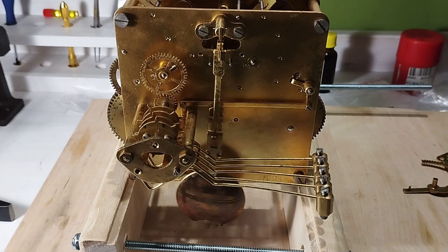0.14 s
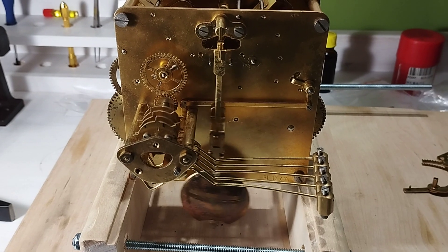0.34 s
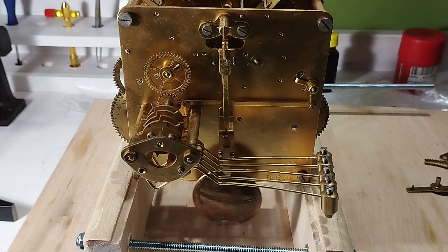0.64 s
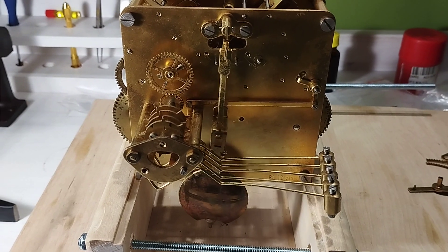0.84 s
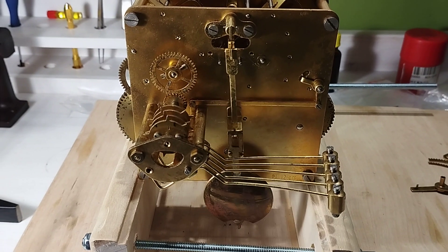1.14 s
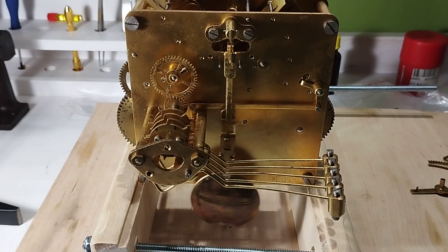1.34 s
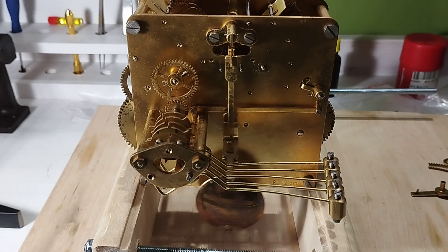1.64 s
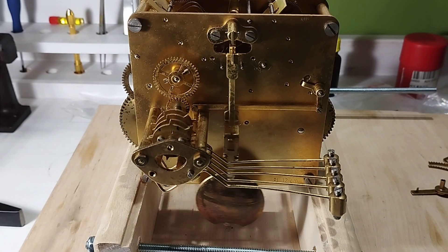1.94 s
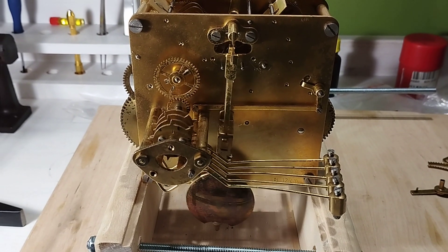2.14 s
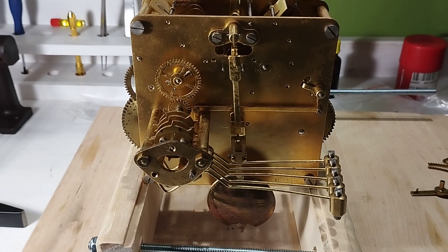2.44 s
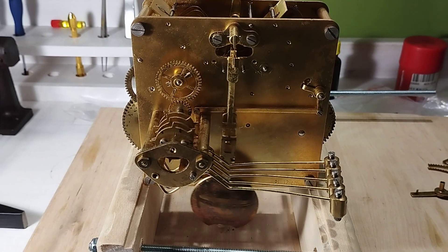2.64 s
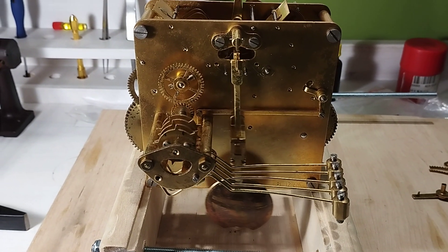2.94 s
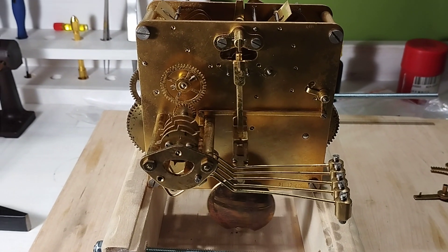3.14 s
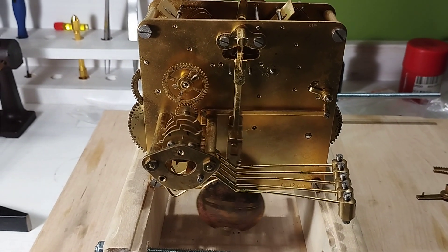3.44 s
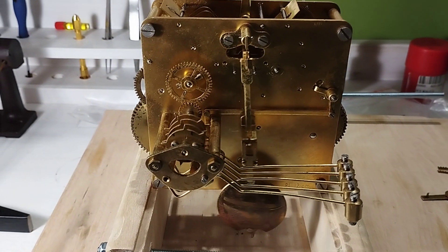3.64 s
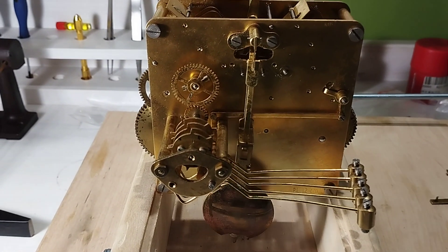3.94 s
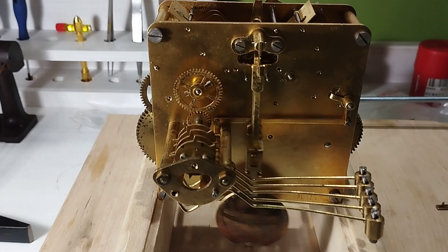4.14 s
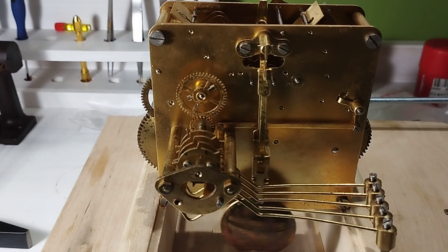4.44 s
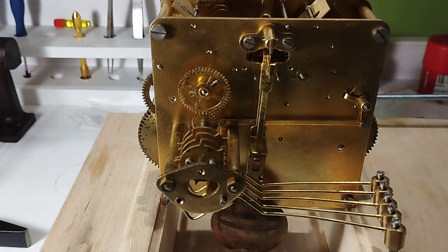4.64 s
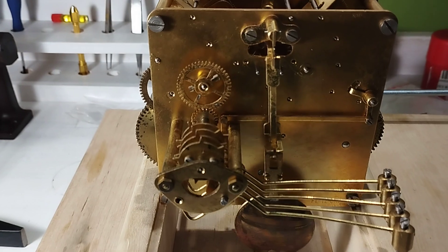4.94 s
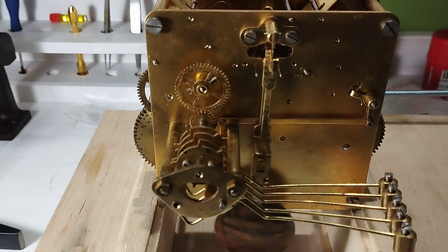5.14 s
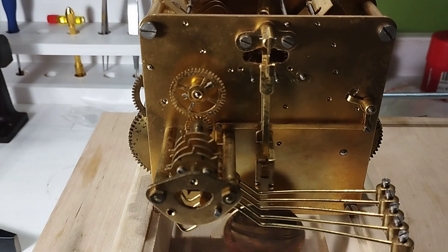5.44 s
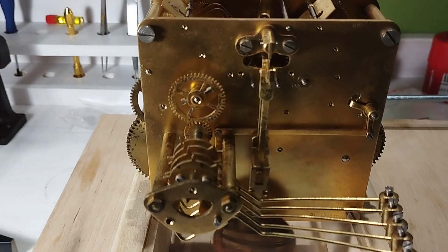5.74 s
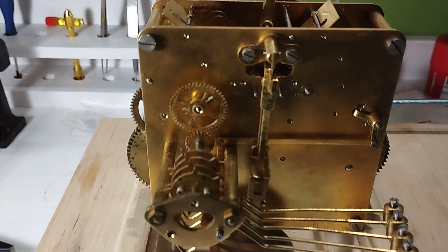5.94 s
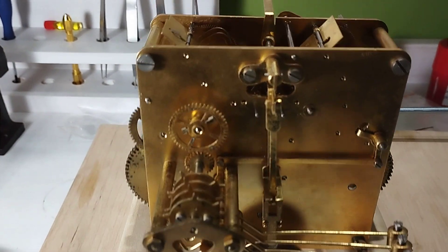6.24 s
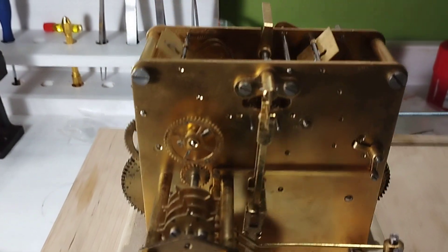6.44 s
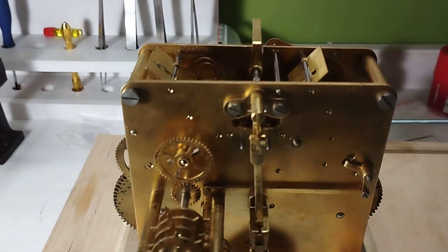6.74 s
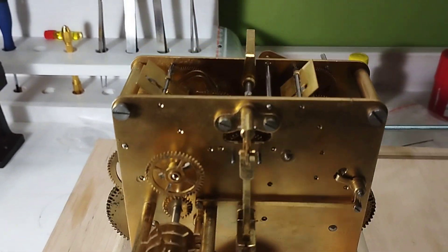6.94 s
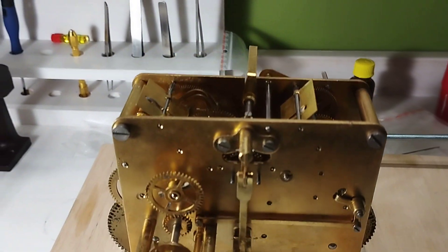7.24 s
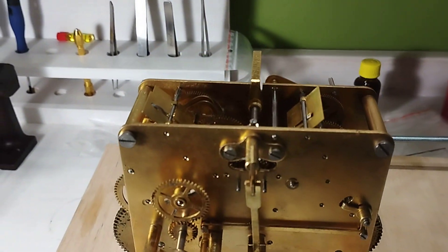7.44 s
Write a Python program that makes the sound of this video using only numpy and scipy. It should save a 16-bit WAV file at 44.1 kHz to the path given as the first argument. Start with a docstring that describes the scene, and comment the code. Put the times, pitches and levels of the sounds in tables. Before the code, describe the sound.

A brass clock movement ticks and tocks steadily, about three crisp beats a second, in a quiet small workshop with faint hum and some handling noise.

```python
"""First you hear the faint noise of a small quiet workshop and an appliance humming far off, then a steady tick-tock.
A brass pendulum movement on a wooden stand makes it: a tooth lands on a pallet and rebounds, so brass modes ring.
A hand-held pair of microphones hears it: the hand wobbles (low noise) and a boom and a dull thud come through
the floor (narrow bands of noise). A sleeve rustles (noise grains), small snaps click, and a finger slips over
the right microphone port (short pressure pulses)."""
import sys
import numpy as np
from scipy import signal
from scipy.fft import rfft, irfft
from scipy.io import wavfile
from scipy.ndimage import uniform_filter1d

SR = 44100
rng = np.random.default_rng(int(sys.argv[2]) if len(sys.argv) > 2 else 0)


def store_pcm(level_fs):
    """Save levels as 16-bit WAV."""
    pcm = np.round(np.clip(level_fs, -1, 1) * 32767).astype(np.int16)
    wavfile.write(sys.argv[1], SR, np.atleast_2d(pcm).T)


N = 334719  # length in samples
TIME_S = np.arange(N) / SR


def amp(db):
    """Turns decibels into a plain factor."""
    return 10 ** (np.asarray(db, float) / 20)


def rms_one(x):
    """Scales a sound to an average (rms) level of 1."""
    return x / np.sqrt(np.mean(x ** 2))


def white(shared):
    """Noise of its own for each side, plus a share that both sides have in common."""
    return rng.standard_normal((2, N)) + shared * rng.standard_normal(N)


def mostly_shared(own):
    """Noise common to both sides, plus a smaller part of its own for each."""
    return rng.standard_normal(N) + own * rng.standard_normal((2, N))


def at_hz(points):
    """Reads the columns of a spectrum table at every frequency of the Fourier transform."""
    hz, *columns = np.transpose(points)
    grid = np.log(np.arange(N // 2 + 1) * SR / N + .1)  # .1 avoids the log of zero
    return np.array([np.interp(grid, np.log(hz), column) for column in columns])


def coloured(noise, db):
    """Gives noise a spectrum by scaling each of its frequencies."""
    return irfft(rfft(noise) * amp(db), N)


def clicks(times_s, sizes):
    """Silence with a one-sample click at each time."""
    out = np.full(N, 1e-18)  # a tiny floor keeps the filters away from extremely small numbers
    out[np.round(np.asarray(times_s) * SR).astype(int)] = sizes
    return out


def ring(x, hz, t60_s):
    """A resonance: a click of size 1 starts a sine of height 1 that falls 60 dB in t60_s."""
    decay = amp(-60 / (t60_s * SR))
    turn = 2 * np.pi * hz / SR
    return signal.lfilter([0, np.sin(turn)], [1, -2 * decay * np.cos(turn), decay * decay], x)


def swelling(x, hz, rise_s):
    """Spreads each click over a fading run of cycles at one pitch."""
    return ring(x, hz, np.log(1000) * rise_s) * 2 / (rise_s * SR)


def band(x, hz, width_hz):
    """Noise passed through one resonance, so only a narrow band is left."""
    return rms_one(ring(x, hz, np.log(1000) / np.pi / width_hz))


def evened(x, seconds):
    """Noise whose level is held nearly steady over a short time."""
    power = uniform_filter1d(rms_one(x) ** 2, size=int(seconds * SR))
    return rms_one(x) / np.sqrt(power + 0.23)


def drift(rate_per_s):
    """A random wander with an average (rms) size of 1."""
    r = np.exp(-2 * np.pi * rate_per_s / SR)
    wander = signal.lfilter([1], [1, -2 * r, r * r], rng.standard_normal(N + SR))
    return rms_one(wander[SR:])  # leave out the first second, while the filter settles


def sides(left_right_db):
    """Splits a level difference evenly: half up on the left, half down on the right."""
    return amp(np.outer([.5, -.5], left_right_db))


RISE_S, FALL_S = 0.05, .12  # straight rise; time to fall to 37 %


def swell(start_s, hold_s):
    """A level that rises to 1, holds, then dies away."""
    t = TIME_S - start_s
    fall = np.exp(-np.maximum(t - RISE_S - hold_s, 0) / FALL_S)
    return np.clip(t / RISE_S, 0, 1) * fall


# Still air and microphone hiss: pitch_hz, left_db (per Hz), right_db (per Hz),
# likeness of left and right (0 none, 1 same)
AIR = [(30, -85, -86, .3), (70, -83, -85, .3), (100, -83, -84, .4), (130, -87, -88, .4),
       (300, -92, -92, .5), (600, -99, -99, .3), (1000, -105, -104.5, 0.), (1500, -108, -106, 0.),
       (2350, -111, -110, 0.), (2750, -113.5, -113, 0.), (4500, -115.7, -114.7, 0.),
       (6500, -120.5, -119, 0.), (8000, -125, -125, 0.), (11000, -126, -126.5, 0.),
       (14000, -118.7, -119.7, 0.), (15700, -118.7, -119.7, 0.)]


def air():
    """Steady coloured noise, partly shared by the two microphones in the bass."""
    *db, alike = at_hz(AIR)
    alike = np.clip(alike, -1, 1)
    mid, side = rfft(rng.standard_normal((2, N)))
    # mid goes to both sides alike, side goes to them with opposite signs
    mixed = np.sqrt((1 + alike) / 2) * mid + np.sqrt((1 - alike) / 2) * side * [[1], [-1]]
    return irfft(mixed * amp(db), N) * np.sqrt(SR / 2)


# Room modes filled by the far hum: pitch_hz, width_hz, level_db (rms)
HUM = [(134.7, 13, -74.5), (162.1, 9.2, -71), (234.2, 9.7, -75.5), (311, 23, -79.5), (418.8, 11, -76),
       (467, 99, -80), (517, 30, -82), (2260, 610, -86.5)]
# Far motor tone: left and right level_db (rms)
MOTOR_DB = [-68, -74.5]
MOTOR_HZ = 412


def hum():
    """A far motor's steady sine, plus narrow bands of noise in the room modes."""
    phase = 2 * np.pi * MOTOR_HZ * TIME_S + [[0], [.3]]  # the right side is slightly ahead
    out = amp(MOTOR_DB)[:, None] * np.sqrt(2) * np.sin(phase)
    for hz, width_hz, level_db in HUM:
        out = out + amp(level_db) * band(mostly_shared(.5), hz, width_hz)
    return out


# Slow sway of the hand: pitch_hz, level_db (per Hz, relative)
SWAY_COLOUR = [(2, -10), (6, 0), (14, -3), (22, -14), (60, -100)]
# Rumble through the casing: pitch_hz, level_db (per Hz, relative)
RUMBLE_COLOUR = [(8, -40), (18, -4), (28, 0), (45, -5), (75, -17), (110, -28), (400, -100)]
# Jerks of the hand: start_s, hold_s (the rumble holds for a share of it), sway_db, rumble_db, left_right_db
JERKS = [(1.948, 0.36, -37, -51, -5), (3.14, 0.025, -50, -68, 7), (3.345, 0.048, -60, -61, -8),
         (6.914, 0.035, -55, -65, 10)]
REST_SWAY_DB, REST_RUMBLE_DB, REST_LEFT_RIGHT_DB = -49.5, -57, 5  # the hand at rest
TREMOR_DB, TREMOR_PER_S = 1.5, 3.0  # how far and how fast the resting level wanders
RUMBLE_HOLD_SHARE = .6


def wobble():
    """Hand motion makes slow pressure swings and a casing rumble, partly shared by the two ports."""
    rest = sides(REST_LEFT_RIGHT_DB)
    sway = rest * amp(REST_SWAY_DB + TREMOR_DB * drift(TREMOR_PER_S))
    rumble = rest * amp(REST_RUMBLE_DB + TREMOR_DB * drift(TREMOR_PER_S))
    for start_s, hold_s, sway_db, rumble_db, left_right_db in JERKS:
        balance = sides(left_right_db)
        sway = sway + balance * amp(sway_db) * swell(start_s, hold_s)
        rumble = rumble + balance * amp(rumble_db) * swell(start_s, RUMBLE_HOLD_SHARE * hold_s)
    noise = white(shared=0.45)
    sway_noise = evened(coloured(noise, at_hz(SWAY_COLOUR)), 0.13)
    rumble_noise = evened(coloured(noise, at_hz(RUMBLE_COLOUR)), 0.048)
    return sway * sway_noise + rumble * rumble_noise


# Low boom through the floor: pitch_hz, width_hz, level_db
BOOM = (72.5, 13, -54.5)
BOOM_START_S, BOOM_HOLD_S = 1.89, .18


def boom():
    """A narrow band of low noise that swells, holds and dies."""
    hz, width_hz, level_db = BOOM
    noise = mostly_shared(0.37)
    narrow = band(band(noise, hz, width_hz), hz, width_hz)
    return amp(level_db) * swell(BOOM_START_S, BOOM_HOLD_S) ** 2 * evened(narrow, 0.06)


# Floor and walls after the thud: pitch_hz, width_hz, t60_s (time to fall 60 dB),
# level_db (before the rise and the fall)
THUD = [(138, 12, 2, -55.5), (162.4, 20, 1.1, -44), (238, 50, 0.76, -52.5), (313, 60, 0.93, -51),
        (505, 100, 0.48, -52), (670, 120, 0.55, -59), (813, 97, 0.26, -58), (1510, 900, 0.19, -69)]
THUD_START_S, THUD_RISE_CYCLES = 6.83, 5  # counted in cycles, so the lows swell more slowly
THUD_GRAIN_DB, THUD_EVEN_S = .8, .035  # it scrapes unevenly, but its body is dense and unbroken


def thud():
    """A dull blow through the floor: bands of noise swell fast and die away, the lows last longest."""
    t = np.maximum(TIME_S - THUD_START_S, 0)
    noise = mostly_shared(0.38)
    grain = amp(THUD_GRAIN_DB * drift(60.0))
    out = np.zeros((2, N))
    for hz, width_hz, t60_s, level_db in THUD:
        body = evened(band(band(noise, hz, width_hz), hz, width_hz), THUD_EVEN_S)
        rise = 1 - np.exp(-t * hz / THUD_RISE_CYCLES)
        fall = amp(level_db - 60 * t / t60_s)
        out += body * grain * rise * fall
    return out


# Rubbing of the sleeve: time_s, level_db (before a lift of 13 dB)
SLEEVE = [(6.7, -88), (6.8, -85), (6.88, -78), (6.95, -82.5), (7.2, -76.5), (7.3, -74.5), (7.335, -73.5),
          (7.358, -70.5), (7.4, -79), (7.52, -83.5), (7.59, -76)]
# Tone of the cloth: pitch_hz, left_db (per Hz, relative), right_db (per Hz, relative)
SLEEVE_COLOUR = [(302, -32, 8), (674, 0.5, -1.5), (1960, -8.5, -2.5), (4570, -10, -3.5), (6500, -16, -5),
                 (7940, -22.5, -22.5), (11100, -18, -21), (13100, -12.5, -19), (15500, -14, -14)]


def sleeve():
    """Cloth rubbing: dense noise grains of uneven size, coloured and faded in and out."""
    time_s, level_db = np.transpose(SLEEVE)
    level_db = np.interp(TIME_S, time_s, level_db, left=-130)
    grains = rng.standard_normal((2, N)) * amp(2.0 * rng.exponential(1, N))
    return amp(level_db + 13.0) * rms_one(coloured(grains, at_hz(SLEEVE_COLOUR)))


# Finger slips on the right port: time_s, push_db (before filtering and the left and right levels)
SLIPS = [(7.1189, -27), (7.1281, -27.5), (7.1369, -47), (7.1492, -37), (7.1515, -31), (7.1549, -37),
         (7.157, -43), (7.457, -43), (7.4636, -34)]
PORT_LOW_HZ, PORT_DULL_HZ = 80, 3000  # the port vents the lows; soft skin dulls the top


def finger():
    """Each slip sucks the membrane out sharply; it swings back as the port vents."""
    time_s, push_db = np.transpose(SLIPS)
    t = np.arange(1, 120) / SR
    suck = t / 0.00049 * np.exp(1 - t / 0.00045)
    starts = clicks(time_s - .0003, -amp(push_db))
    pulse = np.convolve(starts, suck)[:N]
    port = signal.butter(2, [PORT_LOW_HZ, PORT_DULL_HZ], "band", fs=SR, output="sos")
    return signal.sosfilt(port, pulse) * amp([[-30], [1.5]])  # left, right dB


# Stray small snaps: time_s, strike_db (of the click that starts the ring), pitch_hz, left_right_db
SNAPS = [(3.926, -80, 3900, -3.5), (5.3246, -69, 4230, -9), (6.1993, -84, 5500, -4),
         (6.878, -79, 3000, 0.5), (7.355, -72, 4760, -4), (7.544, -69, 1300, 10)]
SNAP_T60_S = 0.0033  # of each of the two resonances in a row


def snaps():
    """Short dry clicks: each strike passes two fast-dying resonances at one broad pitch."""
    out = np.zeros((2, N))
    for time_s, strike_db, hz, left_right_db in SNAPS:
        once = ring(clicks([time_s], amp(strike_db)), hz, SNAP_T60_S)
        out += sides(left_right_db) * ring(once, hz, SNAP_T60_S)
    return out


ROOM_T60_S, ROOM_DB = 0.18, -5


def room(x):
    """Echoes of the small room: a tail of decaying noise, another one for each microphone."""
    t = np.arange(int(.4 * SR)) / SR
    fade_in = np.clip(t / 0.0052, 0, 1)
    tail = rng.standard_normal((2, len(t))) * amp(-60 * t / ROOM_T60_S) * fade_in
    tail /= np.sqrt(np.sum(tail ** 2, axis=1, keepdims=True))
    return amp(ROOM_DB) * signal.fftconvolve(x, tail, axes=1)[:, :N]


# Beats, by turns on the entry pallet (tick) and the exit pallet (tock): start_s, blow_db (over the usual),
# rebound_after_s, rebound_db (over the usual), brightness (dB per octave, weaker in the low modes)
BEATS = [(0.24, 3, 0.02, -4, 0.1), (0.58, 3.5, 0.017, -4.5, 2), (0.8638, 2, 0.0084, -4, 0.1),
         (1.208, 1, 0.019, -1.5, 2), (1.491, 2, 0.02, -11, 1.5), (1.8334, 1.5, 0.036, -20, 2),
         (2.1196, -1, 0.014, -10, -1.5), (2.463, -1.5, 0.024, -2.5, -3), (2.7496, -5.5, 0.015, -11, -0.5),
         (3.0894, -3, 0.021, 1, 0.1), (3.3772, -5, 0.011, -1.5, -2.5), (3.717, 4, 0.019, 0.5, 0.1),
         (4.0031, 1, 0.014, 1, 0), (4.344, 2, 0.021, 3, 0), (4.631, -1.5, 0.021, 0, 0),
         (4.971, 2.5, 0.022, 0, 0), (5.2575, 1, 0.014, -1, -3), (5.5985, 3, 0.02, -14, 1),
         (5.886, 1, 0.018, -6, 0.1), (6.226, 3.5, 0.02, 1.5, -2), (6.5127, 0, 0.018, -1, -2),
         (6.8537, 3.5, 0.021, -4, 0.1), (7.1399, -4, .0173, -14, 1), (7.481, 3.5, 0.024, -5, -1)]


def contacts():
    """Lists the tooth's landings as (times, dB, brightness): ticks, tocks, then all rebounds."""
    start_s, blow_db, after_s, rebound_db, tilt = np.transpose(BEATS)
    ticks = start_s[::2], blow_db[::2], tilt[::2]
    tocks = start_s[1::2], blow_db[1::2], tilt[1::2]
    rebounds = start_s + after_s, rebound_db, tilt
    return [ticks, tocks, rebounds]


# Fade of the stand as the microphones are lifted away from it: dB per second for tick, tock
STAND_FADE_DB_PER_S = [1, 1.2]
# Modes of the wooden stand: pitch_hz, t60_s (of each of two resonances), left_db, right_db (both relative)
STAND = [(518, .08, -10, 4), (670, .05, -18, -14)]
STAND_DELAY_S, STAND_SPREAD_DB = .015, 1  # lag after the beat; random scatter of the push


def stand():
    """The heavy stand is pushed over several cycles, so its ring swells before it dies."""
    start_s = np.array(BEATS)[:, 0]
    count = len(start_s)
    push_db = np.resize([-60, -63], count)  # tick, tock
    push_db = push_db - start_s * np.resize(STAND_FADE_DB_PER_S, count)
    push_db = push_db + STAND_SPREAD_DB * rng.standard_normal(count)
    push = clicks(start_s + STAND_DELAY_S, amp(push_db))
    out = np.zeros((2, N))
    for hz, t60_s, *levels_db in STAND:
        swung = ring(ring(push, hz, t60_s), hz, t60_s) * 40 / (t60_s * SR)
        out += amp(levels_db)[:, None] * swung
    return out


# Tone of the dry crack: pitch_hz, left_db (per Hz, relative), right_db (per Hz, relative)
CRACK_COLOUR = [(500, -37, -42), (1180, -9, -13), (2950, -6, -4), (5800, -5, -9.5), (7350, -11, -2),
                (8150, -16, -22), (10600, -5.5, -15), (13500, -10, -24), (16000, -21, -21)]
CRACK_DB = [[-71, -65], [-79, -73], [-87, -77]]  # left and right for tick, tock and rebound
CRACK_S = 0.006  # time to fall to 37 %


def cracks():
    """A short burst of broad noise at every contact fills in between the brass modes."""
    blows = np.zeros((2, N))
    for levels_db, (times_s, db, _) in zip(CRACK_DB, contacts()):
        blows += amp(levels_db)[:, None] * clicks(times_s, amp(db))
    fading = signal.lfilter([1], [1, -np.exp(-1 / (CRACK_S * SR))], blows)
    return fading * rms_one(coloured(rng.standard_normal((2, N)), at_hz(CRACK_COLOUR)))


# Extra loudness of tick, tock and rebound: level_db
CONTACT_DB = [5, 5.5, 10.5]
# Brass plates and arbors: pitch_hz, t60_s, then strike levels before the extra loudness:
# tick_left_db, tick_right_db, tock_left_db, tock_right_db, rebound_left_db, rebound_right_db
BRASS = [(1119, 0.025, -69, -72, -68, -71, -86, -78), (1453, 0.03, -65, -71, -82, -86, -81, -79),
         (1787, 0.03, -65, -69, -68, -74, -89, -87), (1970, 0.03, -69, -75, -86, -81, -86, -81),
         (2325, 0.03, -68, -69, -74, -75, -90, -89), (2605, 0.02, -74, -79, -85, -88, -93, -86),
         (2993, 0.02, -70, -75, -65, -76, -90, -83), (3176, 0.02, -67, -73, -74, -80, -94, -93),
         (3369, 0.02, -68, -68, -72, -74, -91, -86), (3520, 0.026, -62, -56, -73, -68, -86, -87),
         (3746, 0.02, -71, -59, -75, -75, -91, -85), (4069, 0.02, -74, -66, -80, -77, -86, -87),
         (4295, 0.02, -70, -68, -77, -67, -93, -91), (4600, 0.02, -74, -75, -87, -78, -97, -93),
         (4930, 0.02, -74, -62, -85, -76, -86, -88), (5157, 0.03, -81, -60, -87, -69, -84, -82),
         (5310, 0.03, -79, -67, -87, -77, -79, -72), (5500, 0.026, -80, -68, -89, -78, -79, -71),
         (5800, 0.02, -78, -74, -90, -82, -86, -82), (6083, 0.02, -74, -63, -85, -79, -89, -76),
         (6363, 0.02, -80, -62, -86, -75, -89, -85), (6590, 0.02, -72, -64, -83, -73, -96, -67),
         (7062, 0.02, -79, -70, -86, -77, -86, -77), (7200, 0.02, -82, -71, -84, -74, -89, -83),
         (9130, 0.015, -81, -84, -91, -97, -105, -105), (10750, 0.02, -78, -91, -96, -95, -103, -103),
         (11380, 0.02, -78, -91, -89, -99, -105, -100), (11800, 0.02, -75, -95, -96, -104, -91, -99),
         (12349, 0.02, -73, -102, -87, -102, -100, -105), (13059, 0.02, -75, -87, -100, -102, -99, -103),
         (13404, 0.02, -71, -83, -92, -100, -96, -99), (13727, 0.02, -78, -84, -92, -91, -99, -102),
         (14298, 0.02, -78, -86, -89, -91, -100, -99)]
CLEAN_SHARE = .85  # the part of each blow that is a clean click
CHATTER_S, CHATTER_SHARE = 0.006, 0.045  # each contact rattles on briefly (time to fall to 37 %)
SWELL_CYCLES, MODE_SPREAD_DB = 4, 1.0  # a mode builds up over some cycles; its strength scatters
LAG_CYCLES, LAG_SCATTER_CYCLES = 8, .2  # greatest lag of a mode, and greatest extra lag per blow
STEADY_HZ, FULL_HZ = 1800, 4500  # blows differ little below the first, fully above the second


def escapement():
    """Each contact strikes all brass modes a little differently and rattles on; each side has its own lag."""
    out = np.zeros((2, N))
    grit = rng.standard_normal((2, N))
    for hz, t60_s, *levels_db in BRASS:
        blows = np.zeros((2, N))
        lag_s = rng.uniform(0, LAG_CYCLES, 2) / hz  # low modes tend to set in later
        follows = np.interp(hz, [STEADY_HZ, FULL_HZ], [.15, 1])
        for k, (times_s, db, tilt) in enumerate(contacts()):
            count = len(times_s)
            change_db = db - db.mean() + tilt * np.log2(hz / FULL_HZ)
            scatter_db = rng.normal(0, MODE_SPREAD_DB, count)
            size = amp(CONTACT_DB[k] + db.mean() + follows * change_db + scatter_db)
            shift_s = rng.uniform(0, LAG_SCATTER_CYCLES, (count, 2)) / hz
            for side in range(2):
                strike = size * amp(levels_db[2 * k + side])
                blows[side] += clicks(times_s + lag_s[side] + shift_s[:, side], strike)
        chatter = signal.lfilter([CHATTER_SHARE], [1, -np.exp(-1 / (CHATTER_S * SR))], blows)
        struck = CLEAN_SHARE * blows + grit * chatter
        out += ring(swelling(struck, hz, SWELL_CYCLES / hz), hz, t60_s)
    return out


def scene():
    """Adds the background, the handling noises and the clock; clock and snaps echo in the room."""
    background = air() + hum()
    handling = wobble() + boom() + thud() + sleeve() + finger()
    clock = snaps() + stand() + cracks() + escapement()
    return background + handling + clock + room(clock)


def record(dry):
    """A steep filter cuts the top above 15650 Hz."""
    steep = signal.ellip(14, .5, 60, 15650, fs=SR, output="sos")  # .5 dB ripple, 60 dB cut
    return signal.sosfilt(steep, dry)


dry = scene()
out = record(dry)
store_pcm(out)
```